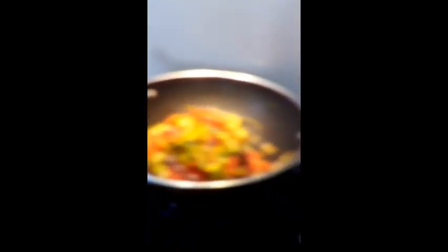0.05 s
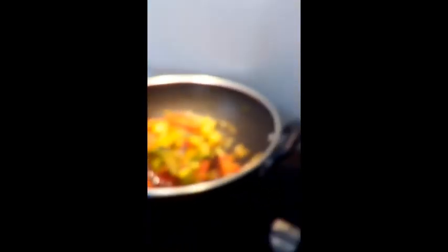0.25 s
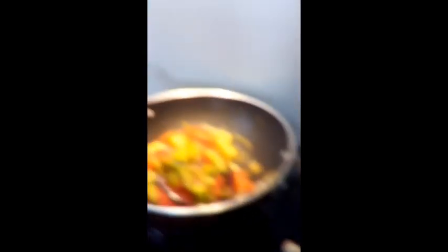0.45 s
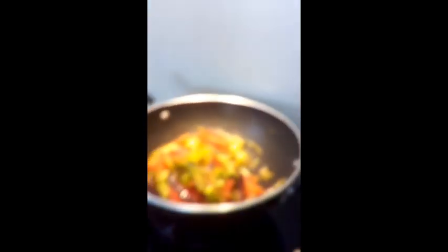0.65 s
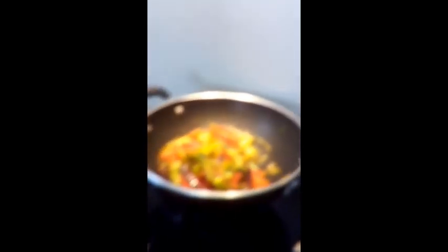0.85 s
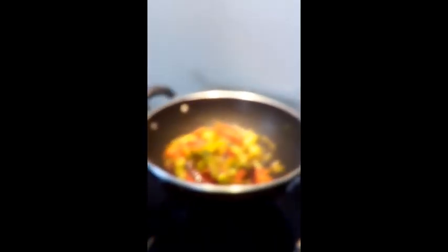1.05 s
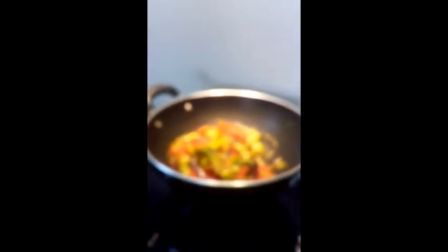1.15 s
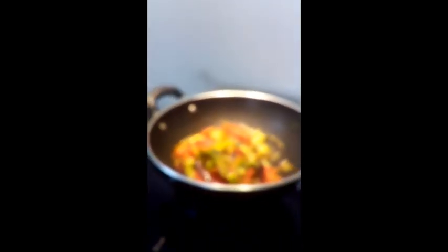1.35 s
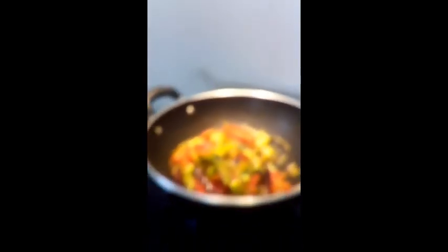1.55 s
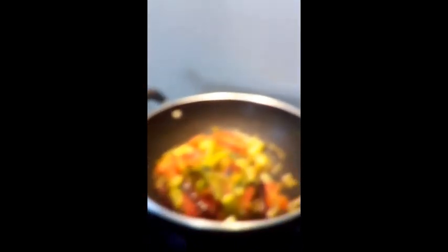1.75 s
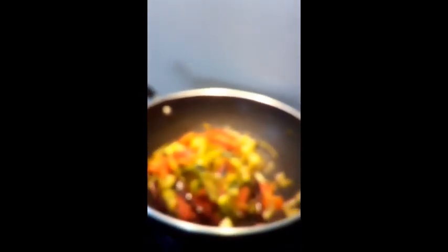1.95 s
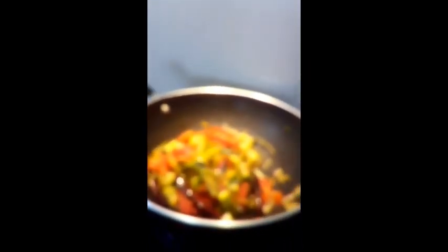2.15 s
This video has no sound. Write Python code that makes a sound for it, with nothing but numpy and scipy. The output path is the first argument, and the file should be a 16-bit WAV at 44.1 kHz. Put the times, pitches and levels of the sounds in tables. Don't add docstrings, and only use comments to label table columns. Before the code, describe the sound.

Sharp metallic clank of a lid on a frying pan, short ring, food sizzling in oil

```python
import sys
import numpy as np
from scipy import signal
from scipy.fft import rfft, irfft, next_fast_len
from scipy.io import wavfile
from scipy.ndimage import uniform_filter1d, minimum_filter1d, map_coordinates

SR = 44100
rng = np.random.default_rng(int(sys.argv[2]) if len(sys.argv) > 2 else 0)


def gain_from_db(level_db):
    decades = np.asarray(level_db, float) / 20
    return 10 ** decades


def store_wav(level_fs):
    pcm = np.round(np.clip(np.atleast_2d(level_fs), -1, 1) * 32767)
    wavfile.write(sys.argv[1], SR, pcm.T.astype(np.int16))


N = 97020
PORT_LAG_S = 0.0001


def unit(x):
    return x / np.sqrt(np.mean(x ** 2) + 1e-20)


def along(points, hz):
    f, v = np.transpose(points)
    return np.interp(np.log(hz + 1), np.log(f + 1), v)


def curve(rows):
    s, v = np.transpose(rows)
    return np.interp(np.arange(N) / SR, s, v)


def wobble(rate):
    knots = rng.standard_normal(int(N * rate / SR) + 4)
    return map_coordinates(knots, [np.arange(N) * rate / SR])


def filtered(x, response):
    size = next_fast_len(N + SR // 2)
    hz = np.fft.rfftfreq(size, 1 / SR)
    return irfft(rfft(x, size) * response(hz), size)[..., :N]


def sided(x, balance, lag_s):
    def response(hz):
        tilt = gain_from_db(np.outer([.5, -.5], along(balance, hz)))
        return tilt * np.exp(np.outer([-1j, 1j], np.pi * hz * lag_s))
    return filtered(x, response)


def blend(a, b, alike):
    u = np.arccos(np.clip(alike, 0, 1)) / 2
    return np.array([np.cos(u) * a + np.sin(u) * b, np.cos(u) * a - np.sin(u) * b])


def rush(spectrum, alike, source=1):
    a, b = filtered(rng.standard_normal((2, N)) * source, lambda hz: gain_from_db(along(spectrum, hz)))
    return unit(blend(a, b, alike))


def onset(t, rise_s):
    return 1 - np.exp(-t / rise_s)


def burst(spectrum, alike, t, db, t60, rise_s):
    return gain_from_db(db - 60 * t / t60) * onset(t, rise_s) * rush(spectrum, alike)[:, :len(t)]


# f/Hz, level/dB per Hz
AIR_SPECTRUM = [(88, -41), (150, -4), (312, -2), (505, -6.5), (540, -7), (1500, -11), (1950, -29.5),
                (3300, -120)]
# f/Hz, level/dB per Hz
FLAME_SPECTRUM = [(13, -43.5), (22, -2.5), (43, -33.5), (62, -8), (82, 4), (173, -12), (220, -23.5),
                  (290, -58.5), (480, -120)]
# t/s, level/dB
FLAME_SWELL_DB = [(0.0, -74), (0.24, -64), (0.36, -67.5), (0.42, -65), (1.16, -72.5), (1.4, -69),
                  (1.51, -64.5), (1.75, -66.5), (2.2, -68)]


def flame():
    flame_db, air_db = -64, -72
    swell_db = curve(FLAME_SWELL_DB)
    flutter = gain_from_db(swell_db - swell_db.mean() + 2.24 * wobble(7.57))
    rumble = gain_from_db(flame_db) * flutter * rush(FLAME_SPECTRUM, 0.79)
    air = gain_from_db(air_db + 0.44 * wobble(4.66)) * rush(AIR_SPECTRUM, 0.43)
    return rumble + air


# t/s, level/dB, f/Hz, length/s, width as a share of f
FAR_KNOCKS = [
    (1.41, -69, 690, .06, .06),
    (1.465, -63, 615, .15, .15),
    (1.44, -57, 4100, .1, .17),
    (1.71, -64, 1450, .14, .25),
    (2.13, -66, 1500, .1, .3),
    (0.99, -69, 1150, .1, .12),
    (1.6, -73, 370, .13, .15),
    (.5, -75, 310, .35, .15),
    (0, -75, 310, .2, .15),
]


def knocks():
    t = np.arange(N) / SR
    out = 0
    for s, db, hz, length, width in FAR_KNOCKS:
        noise = rng.standard_normal((2, N))
        band = unit(filtered(noise, lambda f: np.exp(-((f / hz - 1) / width) ** 2)))
        swell = np.sin(np.pi * np.sqrt(np.clip((t - s) / length, 0, 1)))
        out = out + band * gain_from_db(db) * swell
    return out


# t/s, level/dB
SIZZLE_LEVEL = [
    [(0.0, -53.5), (0.22, -54)],
    [(0.7, -54), (0.87, -54), (1.192, -55), (1.878, -53.5), (2.2, -54.5)],
]
# f/Hz, level/dB per Hz
FIZZ_SPECTRUM = [(530, -50.5), (900, -15), (1280, -9.5), (1510, -15), (1720, -9.5), (4730, 0.5),
                 (6430, -9.5), (8130, -32), (15000, -40.5)]
# f/Hz, left minus right level/dB
PAN_SIDE = [(60, 4), (150, -8), (380, 0), (940, -0.5), (2350, 5.5), (5890, 7.5), (14700, -10.5)]


def sizzle():
    drops_per_s, drops_db, fizz_db = 1500, -9, 1.5
    sizes = gain_from_db(np.minimum(3.5 * rng.exponential(size=(2, N)), 10))
    drops = (rng.random((2, N)) < drops_per_s / SR) * sizes
    hiss = rush(FIZZ_SPECTRUM, 0.025) + gain_from_db(drops_db) * rush(FIZZ_SPECTRUM, .05, drops)
    level_db = curve(SIZZLE_LEVEL[0] + SIZZLE_LEVEL[1]) + fizz_db
    level_db = level_db + 0.68 * wobble(9.29) + 0.94 * wobble(35.4)
    return gain_from_db(level_db) * unit(sided(hiss, PAN_SIDE, PORT_LAG_S))


# t/s, peak level/dB, t60/s
SPIT_EVENTS = [
    (.1518, -43, .01),
    (.7838, -30.5, .012),
    (.791, -46, 0.022),
    (.7995, -39, .008),
    (1.49, -37, 0.01),
]
# f/Hz, level/dB per Hz
POP_SPECTRUM = [(800, -9), (1500, -16), (2300, 6.5), (3200, -8), (4500, 10.5), (6500, -10), (8000, -27),
                (12000, -32), (15000, -53.5)]


def spits():
    out, t = np.zeros((2, N + SR)), np.arange(SR // 10) / SR
    for s, db, t60 in SPIT_EVENTS:
        pop = burst(POP_SPECTRUM, 0.18, t, db, t60, rise_s=0.00034)
        out[:, round(s * SR):][:, :len(t)] += pop
    return sided(out[:, :N], PAN_SIDE, PORT_LAG_S)


# f/Hz, t60/s
ROOM_DECAY = [(150, 0.49), (600, 0.47), (2000, 0.57), (5000, 0.46), (10000, 0.37)]
# f/Hz, likeness 0 to 1
ROOM_LIKENESS = [(100, 1), (300, 1), (700, .2), (2000, .05)]


def kitchen(x):
    hz, t, z = signal.stft(rng.standard_normal((2, SR)), SR, nperseg=256)
    z = blend(z[0], z[1], along(ROOM_LIKENESS, hz)[:, None])
    decay = gain_from_db(-60 * t / along(ROOM_DECAY, hz)[:, None])
    tail = signal.istft(z * decay, SR, nperseg=256)[1]
    tail = tail / np.linalg.norm(tail[0])
    late = np.pad(x, ((0, 0), (150, 0)))
    return signal.fftconvolve(late, tail, axes=1)[:, :N]


def ring(modes, luck, t, start, tilt_db, spread_db):
    hz, db, t60 = np.transpose(modes)[:, :, None]
    level_db = db + tilt_db * np.log2(hz / 3000) - 60 * t / t60

    def heard(port):
        cycles = hz * (t + start) + luck[:, 2] + 0.093 * luck[:, 1 - port]
        waves = gain_from_db(level_db + spread_db * luck[:, port]) * np.sin(2 * np.pi * cycles)
        return waves.sum(axis=0)
    return np.array([heard(0), heard(1)]) * onset(t, 0.00029) ** 2


# t/s, peak level/dB, clatter t60/s, brightness/dB per octave
LID_CONTACTS = [
    (0.2359, -10.5, 0.021, 2.5),
    (.248, -6.5, 0.021, -2),
]
LID_PITCHES = [1006, 1280, 1399, 1517, 2267, 2460, 2750, 3399, 3580, 3830, 3965, 4058, 4412, 5990]
# level/dB, t60/s
LID_MODES = [(-13.5, 0.15), (-16.5, 0.26), (-14, 0.2), (-21.5, 0.42), (-4.5, 0.24), (-2.5, 0.085),
             (-26, 0.19), (-11, 0.12), (-6.5, 0.092), (-1, 0.069), (-17, 0.68), (-3, 0.23), (-13, .25),
             (5.5, 0.05)]
# f/Hz, level/dB, t60/s
BODY_MODES = [(160.8, -20, 0.1), (189.2, -25, 0.094), (277.3, -28, 0.13), (397.7, -23.5, 0.11),
              (509, -15, 0.082), (621, -31.5, 0.21), (770, -18, 0.11)]
# f/Hz, level/dB, t60/s
RIM_MODES = [(7480, -30, .2), (7790, -33, .15), (8333, -27, .2), (8646, -31, .2), (9394, -27, .26),
             (9835, -33, .24), (10820, -30, .2), (11840, -33, .16), (12800, -46, .2), (13560, -34, .1),
             (13800, -44, .14)]
# f/Hz, level/dB per Hz
CLATTER_SPECTRUM = [(71, -45), (120, -20.5), (738, -16), (1010, -5.5), (1640, -11), (2310, -7.5),
                    (3050, -10), (6200, -13.5), (7500, -26), (9750, -70), (16500, -120)]
# f/Hz, level/dB per Hz
SPLASH_SPECTRUM = [(6500, -42), (7500, -15), (8500, 1), (11000, 6), (12600, -16), (13600, -6), (14500, -27),
                   (15500, -58)]
# f/Hz, left minus right level/dB
LID_SIDE = [(100, 0), (300, 2), (1000, 2.5), (2300, 3.5), (4000, 10), (6000, 4), (8500, -5), (14000, -9)]


def lid():
    ring_db, rim_db, clatter_db, minor_db, splash_db = -10.5, -2.5, -4.5, -21, -33
    minor_t60, splash_t60, rise_s = 0.069, .03, 0.00029
    out, t = np.zeros((2, 2, N + SR)), np.arange(int(.8 * SR)) / SR
    short_t = t[:SR // 4]
    band = signal.butter(6, [130, 7560], "bandpass", fs=SR, output="sos")
    named = [(hz, *row) for hz, row in zip(LID_PITCHES, LID_MODES)] + BODY_MODES
    luck = rng.standard_normal((len(named) + len(RIM_MODES), 3, 1))
    for s, db, clatter_t60, tilt_db in LID_CONTACTS:
        low = gain_from_db(ring_db) * ring(named, luck[:len(named)], t, s, tilt_db, spread_db=1)
        high = ring(RIM_MODES, luck[len(named):], t, s, -tilt_db, spread_db=2.5)
        high = gain_from_db(ring_db + rim_db) * high

        hz = rng.uniform(401.2, 6900, size=160)
        minor_level = minor_db + along(CLATTER_SPECTRUM, hz)
        minor = np.transpose([hz, minor_level, minor_t60 * rng.uniform(0.61, 1.79, size=160)])
        minor_luck = rng.standard_normal((len(minor), 3, 1))
        rattle = ring(minor, minor_luck, short_t, s, tilt_db, spread_db=1)
        rattle = np.pad(rattle, ((0, 0), (0, len(t) - len(short_t))))

        puff = burst(CLATTER_SPECTRUM, 0.3, t, clatter_db, clatter_t60, rise_s)
        splash = burst(SPLASH_SPECTRUM, 0.93, t, splash_db - tilt_db, splash_t60, rise_s)
        tones = signal.sosfilt(band, low) + high + splash
        clatter = signal.sosfilt(band, rattle + puff)
        out[..., round(s * SR):][..., :len(t)] += gain_from_db(db) * np.array([tones, clatter])
    return sided(out[..., :N], LID_SIDE, lag_s=.00003)


def scene():
    tones, clatter = lid()
    pops = spits()
    wet = kitchen(gain_from_db(-8) * tones + gain_from_db(1) * clatter + gain_from_db(-5) * pops)
    return tones + clatter + pops + wet + sizzle() + knocks() + flame()


def low_pass(x):
    return signal.sosfilt(signal.butter(12, 15330, fs=SR, output="sos"), x)


def record(dry):
    ceiling, look_s = .72, .0015
    duck_s, duck_len_s, duck_db = .2255, 0.0052, -22
    span = round(look_s * SR)
    need = np.minimum(1, ceiling / (np.abs(dry).max(axis=0) + 1e-9)) ** .7
    gain = uniform_filter1d(minimum_filter1d(need, size=2 * span), size=span)
    u = (np.arange(N) / SR - duck_s) / duck_len_s
    duck = gain_from_db(duck_db * np.clip(np.minimum(u + .5, 4 - 4 * u), 0, 1))
    return low_pass(dry * gain * duck)


dry = scene()
out = record(dry)
store_wav(out)
```